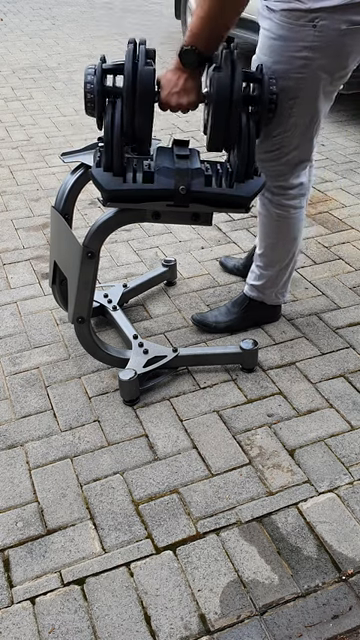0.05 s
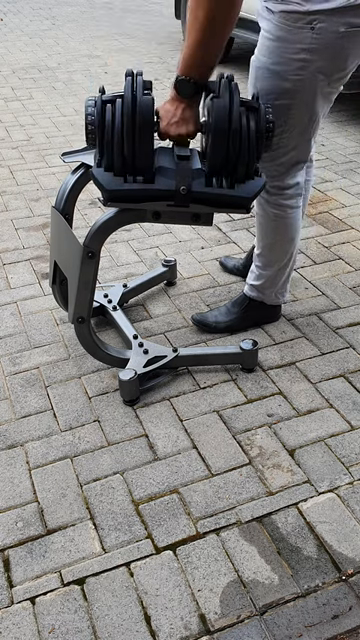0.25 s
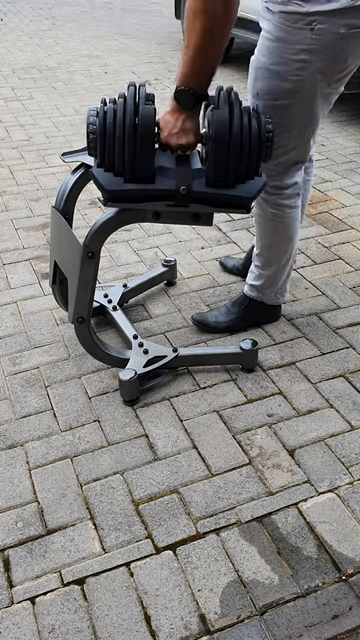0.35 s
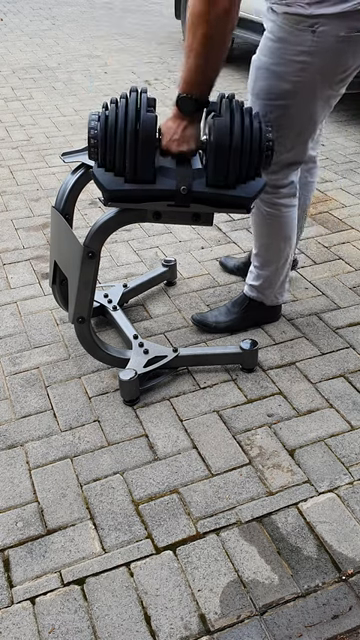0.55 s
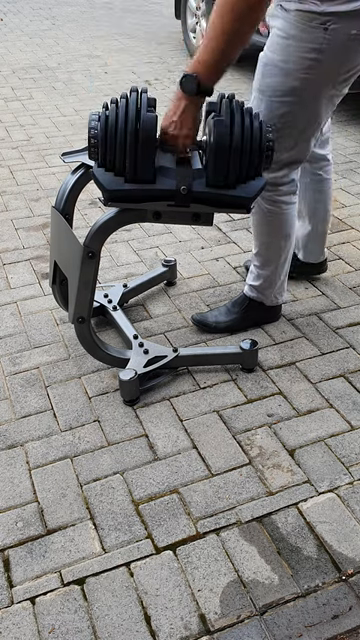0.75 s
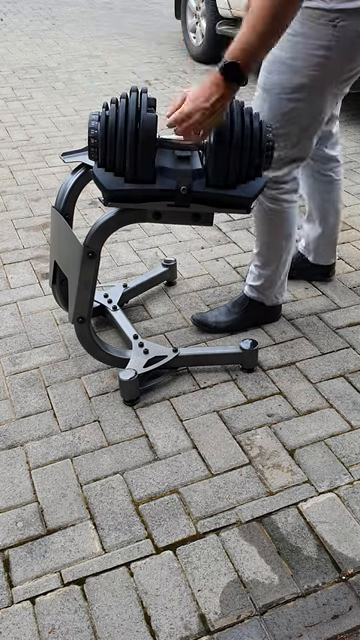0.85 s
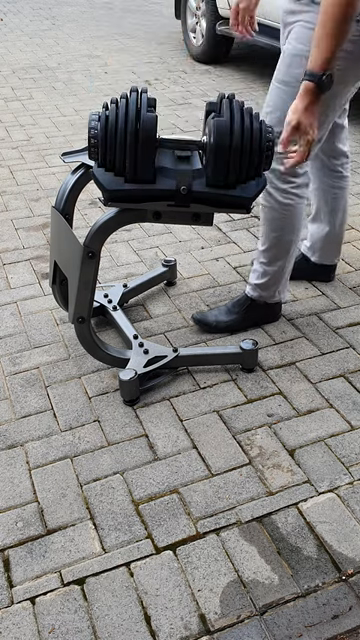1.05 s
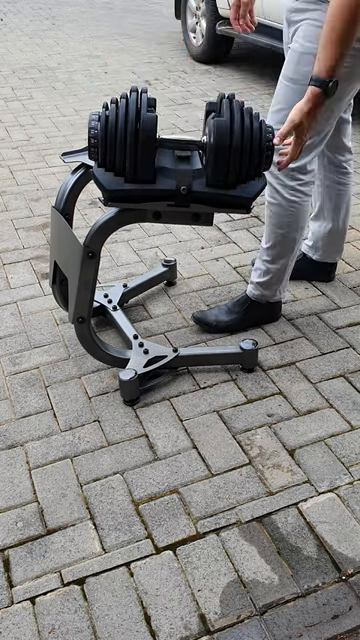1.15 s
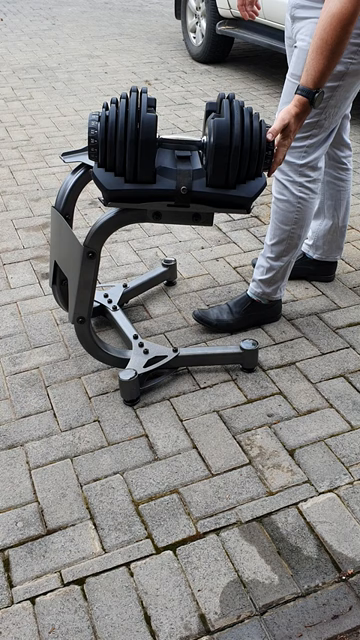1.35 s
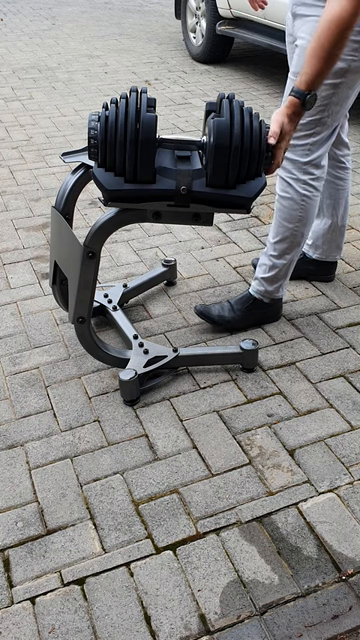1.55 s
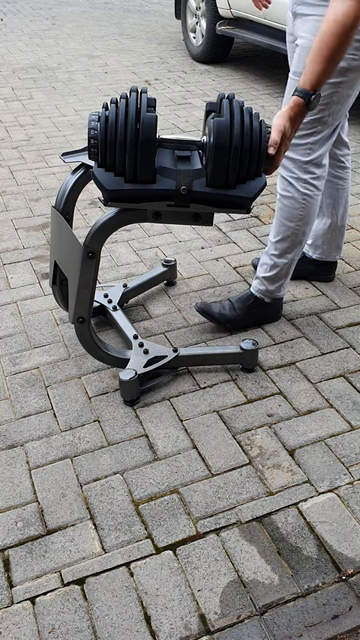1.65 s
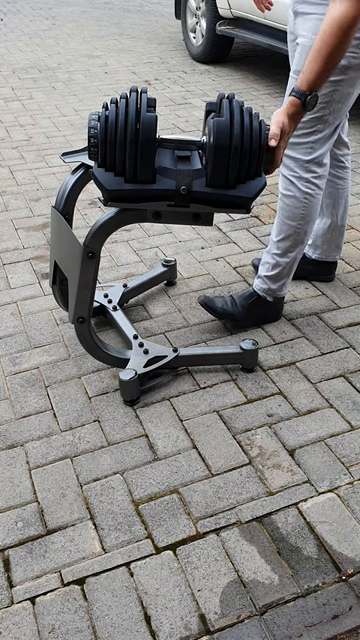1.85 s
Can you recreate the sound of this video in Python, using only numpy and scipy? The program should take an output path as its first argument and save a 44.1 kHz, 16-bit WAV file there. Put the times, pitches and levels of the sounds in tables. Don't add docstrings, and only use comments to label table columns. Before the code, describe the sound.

Close up outdoors, weight plates rattle and land in two dense clunks on a hollow tray and stand, settle quickly, then after quiet with distant birds a hand rubs the dial and it snaps twice.

```python
import sys
import numpy as np
from scipy import signal
from scipy.fft import rfft, irfft, next_fast_len
from scipy.io import wavfile
from scipy.ndimage import uniform_filter1d

SR = 44100
rng = np.random.default_rng(int(sys.argv[2]) if len(sys.argv) > 2 else 0)


def waveform_to_disk(signal):
    frames = np.transpose(np.atleast_2d(signal))
    scaled = np.clip(frames, -1, 1) * 32767
    samples = np.round(scaled).astype(np.int16)
    wavfile.write(sys.argv[1], SR, samples)


def undo_db(level):
    steps = np.asarray(level, float) / 20
    return 10 ** steps


N = 83790


def evened(x):
    return x / np.sqrt(np.mean(x ** 2) + 1e-20)


def read(points, hz):
    f, value = np.transpose(points)
    return np.interp(np.log(hz + 1), np.log(f + 1), value)


def train(times, db):
    out = np.zeros(N)
    at = np.clip((np.asarray(times) * SR).astype(int), 0, N - 1)
    np.add.at(out, at, undo_db(db))
    return out


def ring(blows, modes, scatter_db):
    out, at = np.zeros(N), np.flatnonzero(blows)
    for hz, db, t60 in modes:
        decay, w = 1000 ** (-1 / (t60 * SR)), 2 * np.pi * hz / SR
        spot, sign = rng.standard_normal((len(at), 2)).T
        drive = np.zeros(N)
        drive[at] = blows[at] * undo_db(db + scatter_db * spot) * np.sign(sign)
        out += signal.lfilter([0, np.sin(w)], [1, -2 * decay * np.cos(w), decay ** 2], drive)
    return out


def crack(blows, colour, t60, count=6):
    t, hz = np.arange(2048) / SR, np.fft.rfftfreq(2048, 1 / SR)
    out, kind = np.zeros(N), rng.integers(0, count, N)
    for k in range(count):
        burst = evened(irfft(rfft(rng.standard_normal(2048)) * colour(hz)))
        out += signal.oaconvolve(blows * (kind == k), burst * undo_db(-60 * t / t60))[:N]
    return out


# hz, level_db per Hz
TOWN_COLOUR = [(25, -6.5), (64, 1), (135, -14), (392, -26.5), (1590, -30.5), (1930, -35), (2660, -21),
               (3130, -33.5), (15800, -54)]
# hz, likeness (-1 to 1)
TOWN_LIKENESS = [(60, 1), (240, 0.15), (950, 0.12), (3770, 0.4), (15000, -0.88)]
TOWN_DB = -59


def town():
    frames, hz = N // 512 + 5, np.fft.rfftfreq(2048, 1 / SR)
    a, b, c, d, patches = rng.standard_normal((frames, 1025, 5)).T
    patches = evened(uniform_filter1d(uniform_filter1d(patches, 16, 0), 8, 1))
    same = np.clip(read(TOWN_LIKENESS, hz), -1, 1)[:, None]
    left = a + 1j * b
    right = same * left + np.sqrt(1 - same ** 2) * (c + 1j * d)
    z = np.array([left, right]) * undo_db(read(TOWN_COLOUR, hz)[:, None] + 2 * patches)
    return undo_db(TOWN_DB) * evened(signal.istft(z, nperseg=2048, noverlap=1536)[1][:, :N])


# start_s, length_s, level_db, start_hz, end_hz
BIRD_NOTES = [(0.828, 0.082, -70, 2699, 2646), (0.968, .27, -69, 2695, 2572),
              (1.095, 0.13, -77, 3400, 3330), (1.245, .05, -74, 2806, 2810), (1.28, 0.21, -66, 2750, 2665),
              (1.339, 0.18, -78, 3370, 3380), (1.592, 0.08, -61.5, 2780, 2930),
              (1.637, 0.094, -56.5, 2523, 2540), (1.728, 0.05, -67, 2570, 2500),
              (1.824, 0.11, -51, 2610, 2480), (1.834, 0.03, -69, 5130, 5050),
              (0.996, 0.15, -71.5, 914, 918), (1.112, 0.098, -70, 1583, 1538)]
BIRD_WIDTH_HZ = 95


def birds():
    out = np.zeros((2, N))
    r = np.exp(-np.pi * BIRD_WIDTH_HZ / SR)
    for start, length, db, hz0, hz1 in BIRD_NOTES:
        i, size = int(start * SR), int(length * SR)
        u = np.arange(size) / size
        a, b = rng.standard_normal((2, 2, 14000))
        blur = signal.lfilter([1], [1, -2 * r, r * r], a + 1j * b)[:, 2000:2000 + size]
        blur = 0.61 + blur / np.sqrt(np.mean(abs(blur) ** 2))
        tone = np.exp(2j * np.pi * np.cumsum(hz0 + (hz1 - hz0) * u) / SR)
        note = (blur * tone).real * np.sin(np.pi * u ** 0.52) ** .5
        out[:, i:i + size] += undo_db(db) * note[:, :N - i]
    return out


# hz, t60_s
YARD_T60 = [(100, 0.5), (400, 0.35), (1500, 0.37), (5000, 0.32), (14000, 0.2)]
YARD_MONO_HZ = 450


def yard(x):
    taps = np.zeros((2, SR))
    at = np.arange(200, SR - 20, 20) + rng.integers(0, 20, (2, (SR - 201) // 20))
    np.put_along_axis(taps, at, rng.choice([-1., 1.], at.shape), 1)
    hz, t, z = signal.stft(taps, SR, nperseg=512)
    same = 1 / (1 + (hz[:, None] / YARD_MONO_HZ) ** 2)
    z = np.array([z[0], same * z[0] + np.sqrt(1 - same ** 2) * z[1]])
    tail = signal.istft(z * undo_db(-60 * t / read(YARD_T60, hz)[:, None]), SR, nperseg=512)[1]
    return signal.fftconvolve(x[None], tail / np.linalg.norm(tail[0]), axes=1)[:, :N]


def placed(x, pan_db, lag_s):
    bounce_s, bounce_db = .004, -15
    size = next_fast_len(N + 2048)
    turn = -2j * np.pi * np.fft.rfftfreq(size, 1 / SR)
    bounce = undo_db(bounce_db) * np.exp(turn * bounce_s)
    left = 1 + bounce
    right = np.exp(turn * lag_s) + bounce * np.exp(turn * lag_s * 0.49)
    return irfft(rfft(x, size) * np.array([left, right]), size)[:, :N] * undo_db([[pan_db / 2], [-pan_db / 2]])


# start_s, rise_s, level_db, t60_s
RUSTLE_MOVES = [
    (0.778, 0.019, -57.5, 0.27),
    (1.552, 0.043, -63.5, 0.31),
    (1.82, 0.075, -54, 0.27),
]
# hz, level_db per Hz
RUSTLE_COLOUR = [(200, -10), (1000, -2), (4000, -10), (7000, -26.5), (8500, -29), (15000, -35)]


def rustles():
    t, shape = np.arange(N) / SR, np.zeros(N)
    for start, rise, db, t60 in RUSTLE_MOVES:
        fall_s = np.maximum(t - start - rise, 0)
        shape += np.clip((t - start) / rise, 0, 1) * undo_db(db - 60 * fall_s / t60)
    grains = (rng.random(N) < 3000 / SR) * rng.standard_normal(N)
    return shape * evened(crack(grains, lambda hz: undo_db(read(RUSTLE_COLOUR, hz)), 0.048))


# pitch_hz, level_db, t60_s
TUBE_MODES = [(1007, -65, 3.5)]


def tube_hum():
    return ring(train([.417], 0), TUBE_MODES, scatter_db=0.5)


def slipping(moves, modes):
    rub, t = np.zeros(N), np.arange(N) / SR
    for start, length, db, fade_db in moves:
        rub += undo_db(db + fade_db * (t - start) / length) * ((t > start) & (t < start + length))
    slips = rub * (rng.random(N) < 350 / SR) * rng.standard_normal(N)
    start, _, db, _ = np.transpose(moves)
    rung = ring(slips + train(start, db + 10), modes, scatter_db=3)
    return undo_db(-6.0) * uniform_filter1d(rung, size=6)


# start_s, length_s, level_db, fade_db
ROCKS = [
    (0.498, 0.19, -32.5, -17),
]
# pitch_hz, level_db, t60_s
BED_MODES = [(306, -19, 0.098), (523.5, -3, 0.075), (639, 0.5, 0.072), (710, -0.5, 0.083), (759, -7, 0.08),
             (1034, -11.5, 0.043), (1313, -1, 0.042), (1623, -12.5, .05)]


def rocking():
    return slipping(ROCKS, BED_MODES)


# start_s,
# length_s, level_db, fade_db
TURNS = [
    (0.65, 0.027, -49, -12),
    (1.503, .05, -73.5, 3),
    (1.552, 0.12, -59, -3.5),
    (1.778, .02, -69, -5),
    (1.8, .01, -52.5, 3.5),
    (1.81, .09, -53.5, -6.5),
]
# pitch_hz, level_db, t60_s
CRADLE_MODES = [(380, -11, 0.039), (450, -7.5, 0.081), (546, -8, 0.051), (615, 1.5, 0.063),
                (703.5, 0, 0.091), (859.4, -4, 0.048), (1190, -6, 0.028), (1502, 2.5, 0.023),
                (1707, -7, 0.024), (2283, -15, 0.018), (3175, -12, .015)]


def turning():
    return slipping(TURNS, CRADLE_MODES)


# start_s, peak_db, pitch_hz, t60_s
BONKS = [(0, -36.5, 450, .15), (.088, -43, 520, 0.063), (.097, -40, 198, 0.1), (.1, -46, 1486, .06),
         (.165, -48, 2200, 0.074), (.384, -14.5, 270, .07), (.39, -21.5, 320, 0.093), (.41, -19, 541, 0.1),
         (.651, -39.5, 1596, 0.053), (.66, -39, 530.4, 0.099), (.79, -50, 100, .3), (1.782, -49, 70.2, .15)]


def bonks():
    t, out = np.arange(N) / SR, np.zeros(N)
    for start, db, hz, t60 in BONKS:
        age = t - start
        envelope = undo_db(db - 60 * np.maximum(age, 0) / t60) * np.clip(age * hz, 0, 1)
        out += envelope * np.sin(2 * np.pi * hz * age)
    return out


# start_s, peak_db, clack_pitch_hz, spring_db
SNAPS = [
    (1.6256, -31, 4110, -40),
    (1.6253, -42, 6380, -54),
    (1.631, -36.5, 3870, -50),
    (1.6455, -44, 4300, -48),
    (1.646, -40.5, 5520, -51),
    (1.658, -50, 4830, -43),
    (1.672, -54, 5170, -52),
    (1.8902, -28, 3880, -29),
    (1.8935, -33.5, 7000, -32.5),
    (1.895, -26, 1520, -35),
]
# pitch_hz, level_db, t60_s
SPRING_MODES = [(1615, -8.5, 0.052), (7000, -16, .05), (9017, -24, 0.071), (10300, -10.5, .1),
                (10540, -1, .07), (10520, -16, 0.34), (10770, -5.5, 0.099), (12820, -20, .07),
                (14000, -13, .07), (14000, -7, .09), (14250, -20, .12)]


def dial():
    clack_t60_s, tilt_hz = .018, 7000
    at, peak_db, _, spring_db = np.transpose(SNAPS)
    clacks = np.zeros(N)
    for start, db, hz, _ in SNAPS:
        clacks += ring(train([start], db), [(hz, 0, clack_t60_s)], scatter_db=1.5)
    edge = crack(train(at, peak_db), lambda hz: hz / (hz + 800) / (1 + (hz / tilt_hz) ** 2), 0.029)
    spring = ring(train(at, spring_db), SPRING_MODES, scatter_db=0.0)
    return undo_db(-4) * clacks + undo_db(-9) * spring + undo_db(-10) * edge


def plated(blows, modes, scatter_db, count=4):
    plate = rng.integers(0, count, N)
    shift = 1 + .05 * rng.uniform(-1, 1, (count, len(modes)))
    out = np.zeros(N)
    for k in range(count):
        own = [(hz * s, db, t60) for (hz, db, t60), s in zip(modes, shift[k])]
        out += ring(blows * (plate == k), own, scatter_db)
    return out


# start_s, level_db, brightness_db
CHATTER = [(0, -40.5, -7.5), (0.031, -54.5, -6.5), (0.205, -49, -6.5), (0.217, -27, -12.5),
           (.26, -24, -14.5), (.33, -29.5, -6), (0.379, -40, -4.5), (0.388, -22.5, -9.5), (0.417, -26, -5),
           (.47, -35.5, -9.5), (0.601, -49.5, -21), (.72, -65, -16), (0.898, -69.5, -37)]
# start_s, peak_db, brightness_db, weight_db
KNOCKS = [(.002, -44, -12.5, -1.5), (.086, -37, -8.5, -7), (0.104, -36, -19, 3), (.123, -47, -18, 6.5),
          (0.162, -49.5, -12.5, 5.5), (0.216, -20, -22, 1), (.221, -19, -19.5, -2), (.239, -14.5, -27, -3),
          (0.2424, -16.5, -26, -2), (.254, -17, -19, -5), (.257, -13.5, -23, -6), (.266, -16, -14, -3.5),
          (.279, -15, -18.5, 1.5), (.286, -17.5, -15, -3), (.293, -19.5, -12, -5.5), (.307, -21, -14, -1.5),
          (0.317, -17.5, -17.5, 3.5), (.322, -20.5, -12, 3.5), (.326, -20.5, -12.5, 3.5),
          (.331, -17.5, -13.5, 2.5), (0.34, -21.5, -17, -0.5), (.35, -24.5, -17, 2), (.384, -14, -15, 8.5),
          (.39, -14, -20, 4.5), (.395, -12.5, -18.5, -1.5), (.401, -12.5, -12.5, 1),
          (.41, -11.5, -13.5, -5), (.417, -10, -10, -5), (.424, -13, -14, -5), (.432, -14, -16.5, -5.5),
          (.441, -19, -16.5, -2.5), (.447, -22.5, -8, -6.5), (.454, -19.5, -12.5, -8.5),
          (0.462, -22, -20.5, 2), (0.476, -24.5, -19, 6.5), (.486, -21.5, -21, 4), (0.501, -25, -18, 5.5),
          (0.509, -28.5, -20, 1.5), (.518, -26, -14.5, -12), (.541, -32.5, -15.5, 3.5),
          (.555, -31.5, -30, 2.5), (0.615, -45, -22, -14), (0.651, -36.5, -28, -25),
          (.747, -40.5, -37, -26)]
# pitch_hz, level_db, t60_s
TRAY_MODES = [(446.5, -1, 0.068), (535, -0.5, 0.049), (658.5, -2, 0.045), (784, -6, 0.036),
              (881, -4.5, 0.054), (1074, -8.5, 0.047), (1205, -7, 0.04), (1347, -10.5, 0.04),
              (1509, -5.5, 0.04), (1704, -10.5, 0.035), (2273, -9.5, 0.05), (2400, -7.5, 0.03),
              (3300, -21.5, 0.021), (4000, -14.5, .025)]
# pitch_hz, level_db, t60_s
THUMP_MODES = [(160, -11, 0.069), (193, -2.5, 0.07), (239, -6.5, 0.05), (282, -2.5, 0.05),
               (333, -2.5, 0.06), (375.6, -3.5, 0.068), (414, -7, 0.074)]
# pitch_hz, level_db, t60_s
STAND_MODES = [(81, -22, .3), (100.77, -22.5, 0.49), (529, -32.5, 0.24), (637, -30, .3), (710, -27, 0.23),
               (720, -32, .3), (980, -33, 0.12)]
# hz, level_db per Hz
CRACK_COLOUR = [(300, -51), (800, -4), (1400, -4), (2800, -13.5), (4100, -15), (5000, -20), (9000, -34.5),
                (15800, -45)]
CHATTER_PER_S, CHATTER_SPREAD_DB, CRACK_T60_S = 800, 3.5, 0.028


def plates():
    t, (s, level_db, bright_db) = np.arange(N) / SR, np.transpose(CHATTER)
    at, peak_db, edge_db, weight_db = np.transpose(KNOCKS)
    ends = []
    for _ in range(2):
        hits = (rng.random(N) < CHATTER_PER_S / SR / 2) * (t < s[-1])
        spread = CHATTER_SPREAD_DB * np.minimum(rng.exponential(1, N), 3)
        hits = hits * undo_db(spread + np.interp(t, s, level_db))
        blows = undo_db(-17.5) * hits + undo_db(-15.5) * train(at, peak_db)
        heavy = undo_db(-20) * hits + undo_db(-16.0) * train(at, peak_db + weight_db)
        edges = hits * undo_db(np.interp(t, s, bright_db)) + undo_db(3.0) * train(at, peak_db + edge_db)
        tray = plated(blows, TRAY_MODES, scatter_db=4.5)
        thump = uniform_filter1d(plated(heavy, THUMP_MODES, scatter_db=1.0), size=24)
        stand = ring(heavy, STAND_MODES, scatter_db=2)
        ends.append(tray + thump + stand + crack(edges, lambda hz: undo_db(read(CRACK_COLOUR, hz)), CRACK_T60_S))
    return ends


def scene():
    far = (town() + birds()) * undo_db([[-0.45], [0.45]])
    middle = rustles() + tube_hum() + rocking() + turning() + bonks()
    small = dial()
    near_end, far_end = plates()
    near = placed(near_end, pan_db=6.5, lag_s=0.000303) + placed(far_end, pan_db=-2, lag_s=0.00056)
    near = near + placed(middle, pan_db=1.0, lag_s=0.00044) + placed(small, pan_db=7.5, lag_s=.0003)
    return near + undo_db(-5.5) * yard(near_end + far_end + middle) + undo_db(-2.5) * yard(small) + far


def top_cut(x):
    return signal.sosfilt(signal.butter(12, 16330, fs=SR, output="sos"), x)


# hz, level_db
PORT_TILT = [(100, -2.5), (1000, -2.5), (4000, 1.5), (12000, 5.5)]


def record(dry):
    tilt_db = read(PORT_TILT, np.fft.rfftfreq(N, 1 / SR)) / 2
    ported = irfft(rfft(dry) * undo_db([tilt_db, -tilt_db]), N)
    low = signal.butter(3, 44.6, "high", fs=SR, output="sos")
    high = signal.butter(14, 14700, "low", fs=SR, output="sos")
    return top_cut(signal.sosfilt(np.vstack([low, high]), ported))


dry = scene()
out = record(dry)
waveform_to_disk(out)
```